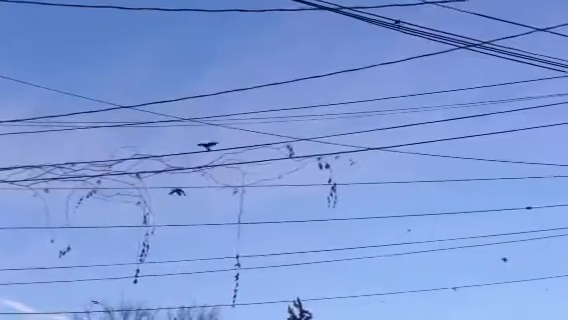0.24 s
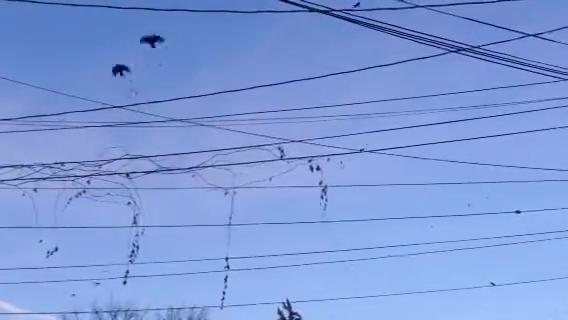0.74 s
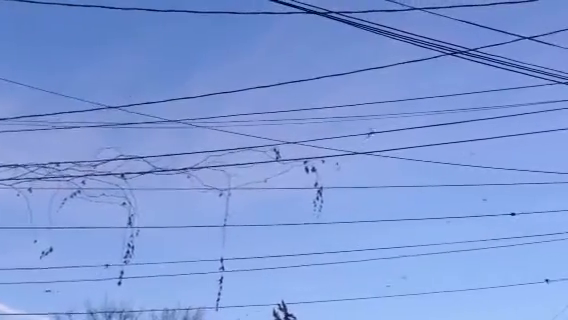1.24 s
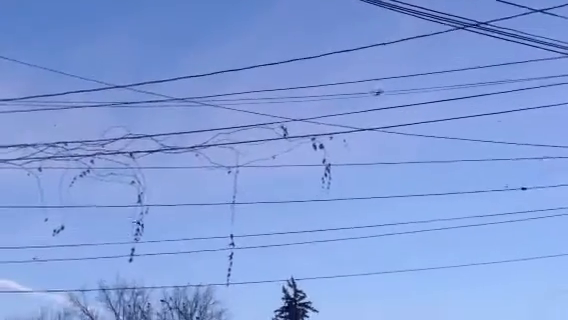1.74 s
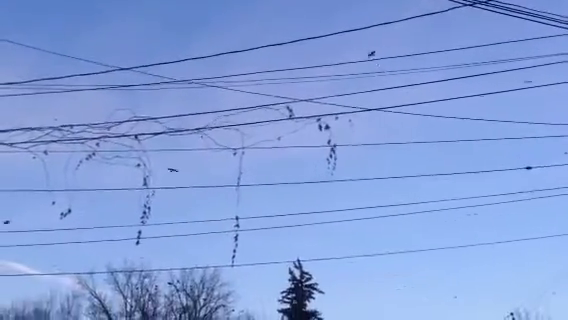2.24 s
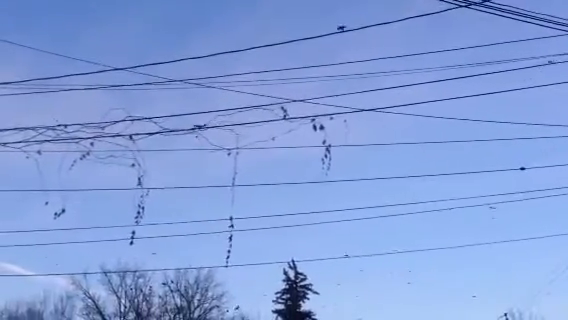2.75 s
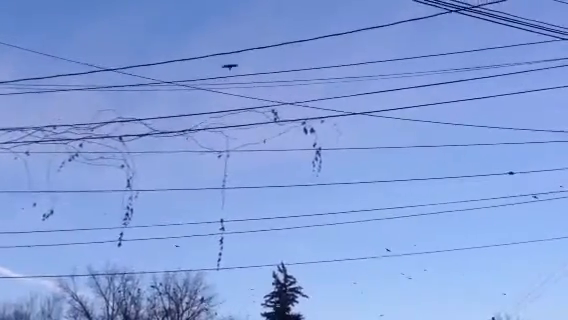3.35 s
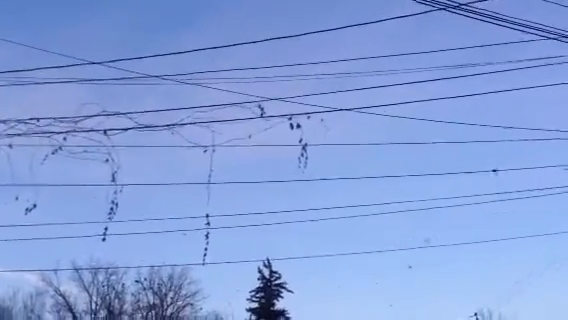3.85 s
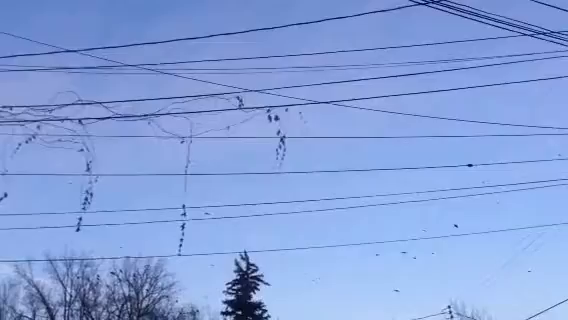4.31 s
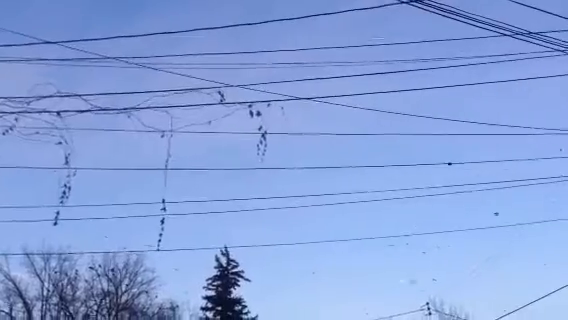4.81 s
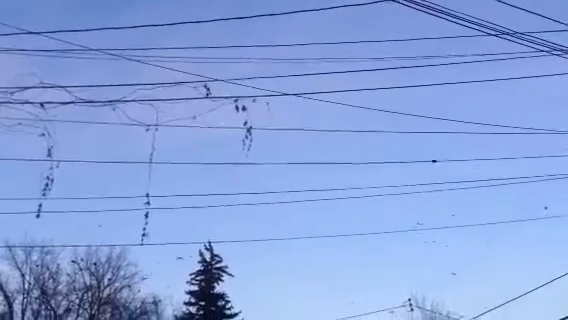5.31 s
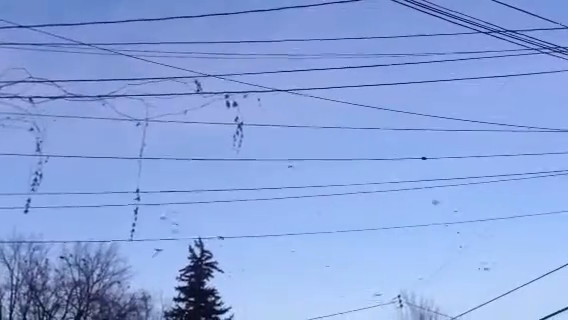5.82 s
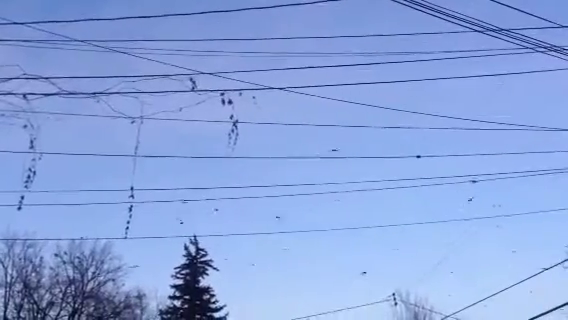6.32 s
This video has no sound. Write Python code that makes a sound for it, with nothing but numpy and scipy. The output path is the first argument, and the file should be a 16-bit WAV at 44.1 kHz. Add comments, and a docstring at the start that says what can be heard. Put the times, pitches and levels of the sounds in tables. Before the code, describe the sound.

A large flock of crows caws in a dense overlapping chorus outdoors, with nearer hoarse caws, a few clear yelps and one dry rattle.

```python
"""A winter street in a town, with a big flock of crows cawing over it. Nearer birds stand out with
arched, hoarse caws, one yelps on a high clear note and one gives a long dry rattle.
Each caw is a gliding stack of harmonics plus breath noise; each rattle knock is a short rising blip.
Many quieter caws blend into a far chorus, and houses and trees scatter all the calls.
Below them, filtered noise makes a low town rumble and microphone hiss, with a faint hum."""
import sys
import numpy as np
from scipy import signal
from scipy.fft import rfft, irfft, next_fast_len
from scipy.io import wavfile

SR = 44100
rng = np.random.default_rng(int(sys.argv[2]) if len(sys.argv) > 2 else 0)


def unload_wav(signal):
    """Save mono or channel-first audio to the path in sys.argv[1] as 16-bit WAV at rate SR, clipped to [-1, 1]."""
    wavfile.write(
        sys.argv[1],
        SR,
        np.round(np.clip(np.atleast_2d(signal).T, -1, 1) * 32767).astype(np.int16),
    )


N = 289737  # length of the scene in samples


def near_crows():
    """The birds that stand out of the chorus: hoarse caws, and the high, clear yelps of one bird."""
    # Nearer caws, levels before the final mix:
    # (start [s], length [s], top pitch [Hz], level [dB], treble setting [dB], roughness [0-1])
    caws = [ (-.06, 0.26, 595.4, -52.5, 3, 0.3), (0.113, .11, 648, -56, 3, .9),
            (0.477, 0.17, 698, -44.5, -2, 0.28), (0.53, .21, 593, -53.5, 9.5, 0.48),
            (0.875, .11, 776, -55, 2, 0.12), (1.015, 0.15, 690, -54.5, -9, 0.57),
            (1.481, 0.12, 596, -53.5, 1, 0.42), (1.581, .14, 671, -48.5, -2.5, 0.64),
            (2.062, 0.15, 700, -50.5, 0.5, 0.5), (2.158, 0.18, 609, -52, 0.5, 0.52),
            (2.579, 0.1, 665, -49, -2.5, 0.25), (2.67, 0.15, 705, -51.5, 2.5, 0.57),
            (2.747, .1, 720, -41, -8, 0.17), (2.81, 0.18, 690, -47.5, 0.5, 0.84),
            (3.126, 0.14, 727, -43.5, -8, 0.37), (3.287, .19, 690.4, -48, -4.5, 0.45),
            (3.199, .28, 647, -55, 6, 1), (3.439, 0.25, 665, -63, 15, 0.81),
            (3.826, .09, 714, -39.3, -10, 0.04), (3.948, .14, 731, -46, 1, 0.43),
            (4.06, .19, 639, -52, 7, .4), (4.237, 0.085, 718.4, -41, -6, .25),
            (4.328, 0.13, 680, -51, -1.5, 0.94), (4.548, .17, 700, -51, -1.5, 0.82),
            (4.92, 0.15, 754, -49, -6, 0.13), (5.658, 0.12, 766.4, -45, -1.5, 0.21),
            (5.829, .14, 650.5, -49, 5, 0.33), (6.02, .12, 785, -46.5, 4, 0.24),
            (6.214, .12, 689, -46.5, 3.5, 0.4), (6.307, 0.11, 667, -51.5, 3, .7),
            (6.475, .085, 765, -57, 10, 0)]
    # Yelps, levels before the final mix: (start [s], length [s], level [dB], treble setting [dB])
    yelps = [(1.123, 0.083, -52.5, -7), (1.364, 0.094, -56.5, -1), (1.614, 0.095, -57.5, -1),
             (1.848, .1, -58.5, 0), (6.333, .13, -50, 2)]
    yelp_hz, yelp_rough = 819, 0.032  # top pitch, and roughness from 0 to 1
    out = np.zeros(N)
    for start, length, top_hz, level_db, treble_db, rough in caws:
        call = near_caw(length, top_hz, treble_db, rough)
        add(out, start, undb(level_db) * call)
    for start, length, level_db, treble_db in yelps:
        call = near_caw(length, yelp_hz, treble_db, yelp_rough)
        add(out, start, undb(level_db) * call)
    return out


def near_caw(length, top_hz, treble_db, rough):
    """A caw by the shared rules: higher calls crest later, harsher ones gain edge and hiss."""
    usual_hz, usual_crest, crest_per_octave = 699, .36, 0.34  # crests are shares of the call's length
    crest = usual_crest + crest_per_octave * np.log2(top_hz / usual_hz)
    edge_db = -0.5 + 0.71 * treble_db  # near 3.4 kHz
    hiss_db = 0.35 + treble_db  # near 5.6 kHz
    return caw(length, top_hz, crest, .2, edge_db, hiss_db, rough)


def caw(length, top_hz, crest, fall, edge_db, hiss_db, rough, count=12, rise=.14, jitter=0.025,
        rasp_hz=75, breath=1.0, fray=0.24, flicker=0.36, yelp_db=9.5):
    """One caw: an arch of harmonics through the throat, shaken by a second, slow flutter of the syrinx."""
    # Filtering by the throat and open beak: (frequency [Hz], gain [dB])
    throat = [(500, -19.5), (730, -17), (950, -14), (1180, 1.5), (1430, 5), (1750, -3), (2050, -13.5),
              (2700, -24.5), (3500, -14.5), (4200, -21), (5700, -19.5), (7000, -32), (10000, -32),
              (14000, -40)]
    rasp_depth = .85
    dice = rng.standard_normal((3 + 2 * count, 512))
    t = np.arange(int(max(length, .03) * SR)) / SR
    u = t / t[-1]  # progress through the call, 0 to 1
    crest = np.clip(crest, .15, .85)
    rough = np.clip(rough, .01, 1)

    # The pitch climbs to the crest, then drops by the share "fall".
    climb = rise * np.clip(1 - u / crest, 0, 1) ** 2
    drop = fall * np.clip((u - crest) / (1 - crest), 0, 1) ** 1.6
    hz = top_hz * (1 - climb - drop)
    flutter_hz = rasp_hz * (1 + 0.351 * wander(t, 88.6, dice[0]))
    flutter = np.sin(2 * np.pi * np.cumsum(flutter_hz) / SR)
    shake = rough * jitter * (2 * wander(t, 596.1, dice[1]) + flutter)
    phase = 2 * np.pi * np.cumsum(hz * (1 + shake)) / SR

    opening = np.abs(np.sin(np.pi * u))  # the beak is widest in mid-call
    voice = 0
    for k in range(1, count + 1):
        # uneven beats of the membranes fray the high harmonics most
        slip = fray * k ** 1.326 * rough ** 0.32 * wander(t, 450, dice[1 + 2 * k])
        flickering = np.exp(flicker * wander(t, 69.3, dice[2 + 2 * k]))
        size = gain_at(k * hz, throat) * flickering * opening ** (0.0091 * k)
        voice = voice + size * np.sin(k * phase + slip)

    # Breath noise passes the same throat; the rasp shakes voice and breath together.
    air = np.resize(unit(colour(rng.standard_normal(2 ** 13), throat)), len(t))
    shaking = rasp_depth * flutter + 0.39 * wander(t, 108.0, dice[2])
    rasp = np.exp(np.sqrt(rough) * shaking / 2)
    voice = unit((unit(voice) + breath * rough * air) * rasp * opening ** 0.37)
    # calls that peak above 785 Hz are yelps, with a strong third harmonic
    yelp = yelp_db * np.clip((top_hz - 785) / 25, 0, 1)
    return colour(voice, [(1800, 0), (2350, yelp + edge_db / 3), (2800, yelp / 2 + edge_db - 4.0),
                          (3400, edge_db), (5600, hiss_db)])


def rattle(count=22, low_hz=1500, high_hz=2170, sweep_s=0.0079, width_s=0.0041, grit=0.71, echo_db=-6):
    """A crow's rattle: gritty knocks whose resonance flicks upward, blurred by branches around the bird."""
    # The run of knocks slows a little: each gap is longer than the last by slowing_s.
    start_s, gap_s, slowing_s = 3.4277, .04206, .000184
    # The run fades at both ends and its knocks are uneven; the level is before the final mix.
    level_db, fade_db, uneven_db = -43, 3.5, 1.1
    crest = 0.48  # share of the run at which it is loudest, apart from the unevenness
    out = np.zeros(N)
    t = np.arange(-SR // 50, SR // 50) / SR  # time around the middle of a knock
    since_start = t - t[0]
    hz = low_hz + (high_hz - low_hz) * (1 + np.tanh(2 * (t / sweep_s) + .5)) / 2
    for k, dice in enumerate(rng.standard_normal((count, 3, 128))):
        when = start_s + k * gap_s + k * (k - 1) / 2 * slowing_s
        fade = fade_db * (2 * (k / count - crest)) ** 2
        knock_db = level_db - fade + uneven_db * dice[2, 0]
        phase = 2 * np.pi * np.cumsum(hz) / SR + grit * wander(since_start, 697, dice[0])
        size = np.exp(-(t / width_s) ** 2 / 2 + 0.26 * wander(since_start, 522, dice[1]))
        add(out, when + t[0], undb(knock_db) * size * np.sin(phase))
    out = out + undb(echo_db) * scatter(out, t60=0.47, delay_s=0.0036)
    # the nearly closed beak passes one band
    return colour(out, [(900, -15), (1250, 0.5), (2250, -1.0), (2550, -15)])


def far_flock(count=130, bright_db=-4.0, spread_db=8, effort=0.97, gape_db=6):
    """Many birds, each with its own pitch and distance; air dulls them, excitement makes them harsher."""
    # Level before the final mix, which also sets the flock's excitement: (time [s], level [dB])
    flock_levels = [(0.0, -48.5), (0.27, -54.5), (0.51, -54), (0.66, -52.5), (1.06, -51), (1.22, -55.5),
                    (2.14, -53), (2.23, -51), (3.24, -49.5), (3.64, -49.5), (4.1, -47.5), (4.7, -52),
                    (5.07, -49.5), (5.53, -55.5), (6.2, -49.5), (6.57, -57)]
    out = np.zeros(N)
    times, levels = np.transpose(flock_levels)
    for i, (when, length, pitch, distance, rough) in enumerate(rng.random((count, 5))):
        start = (i + when) / count * (N / SR + .2) - .2  # one call at random in each equal slot
        excitement_db = np.interp(start, times, levels) - levels.mean()
        harsh_db = bright_db + effort * excitement_db
        call = caw(.11 + .13 * length, 600 + 180 * pitch, 0.401, .18, harsh_db, harsh_db,
                   0.16 + 0.67 * rough, count=8)
        add(out, start, undb(-spread_db * distance) * call)
    level_db = np.interp(np.arange(N) / SR, times, levels)
    # excited birds gape wider, which lifts the band around 2 kHz
    gape = np.clip((level_db - levels.min()) / np.ptp(levels), 0, 1)
    wide = colour(out, [(1400, 1.0), (1750, gape_db / 2), (2100, gape_db), (2600, -0.71), (3400, 1)])
    return unit(out + gape * (wide - out)) * undb(level_db)


def scatter(x, t60, delay_s=0.023, treble_db=-5):
    """Echoes from surfaces such as house fronts and trees: grainy, fading and duller than the call."""
    t = np.arange(SR) / SR
    grains = rng.standard_normal(SR) ** 3  # cubing makes a few echoes stand out
    fade = undb(-60 * t / t60)  # t60 is the time in seconds to fade by 60 dB
    build_up = 1 - np.exp(-(t / delay_s) ** 2)
    echoes = grains * fade * build_up
    tail = signal.fftconvolve(x, echoes / np.linalg.norm(echoes))[:N]
    return colour(tail, [(1500, 0.021), (6000, treble_db)])


def town(hum_hz=59, hum_db=-67):
    """Far traffic rumbles and swells under an even hiss, with a faint machine hum."""
    # Spectrum of town rumble and microphone hiss, before scaling: (frequency [Hz], level per Hz [dB])
    town_spectrum = [(20, -30), (40, -8.5), (60, -0.5), (80, -6), (125, -0.5), (165, -8.5), (300, -11.5),
                     (500, -18), (720, -16.5), (1100, -20.5), (2700, -29.5), (6000, -30.5), (10000, -35),
                     (15000, -35)]
    # Swell of the traffic, as gain changes:
    # (time [s], deep rumble below 60 Hz [dB], engine drone near 120 Hz [dB])
    traffic_swell = [(0, -1, 2), (.8, 0, 5.5), (1.4, -3, -2.5), (3.5, -7, -1), (4.3, -6.5, 1.5),
                     (6.57, 2, 0.5)]
    level_db = -56.5  # of rumble and hiss together, before the swell
    t = np.arange(N) / SR
    times, deep_db, drone_db = np.transpose(traffic_swell)
    air = unit(colour(rng.standard_normal(N), town_spectrum))
    low = colour(air, [(170, -3.5), (500, -33)])
    deep = colour(low, [(55, -1.5), (110, -41)])
    rumble = deep * undb(np.interp(t, times, deep_db))
    drone = (low - deep) * undb(np.interp(t, times, drone_db))
    hum_level_db = hum_db + 2.1 * wander(t, 3.5, rng.standard_normal(256))
    hum = undb(hum_level_db) * np.sin(2 * np.pi * hum_hz * t)
    return undb(level_db) * (air - low + rumble + drone) + hum


def undb(db):
    """Decibels to gain."""
    return 10 ** (np.asarray(db) / 20)


def unit(x):
    """Scale to an rms (average strength) of 1."""
    return x / np.sqrt(np.mean(x ** 2) + 1e-20)


def gain_at(hz, points):
    """Gain at the given frequencies, read from (frequency [Hz], level [dB]) points."""
    f, db = np.transpose(points)
    return undb(np.interp(np.log(hz + 1e-6), np.log(f), db))


def colour(x, points):
    """Filter a sound by (frequency [Hz], level [dB]) points."""
    size = next_fast_len(len(x))
    gain = gain_at(np.fft.rfftfreq(size, 1 / SR), points)
    return irfft(rfft(x, size) * gain, size)[:len(x)]


def wander(t, rate, dice):
    """Random values joined by lines, `rate` of them a second."""
    return np.interp(t * rate, np.arange(len(dice)), dice)


def add(out, start, x):
    """Mix a sound in at a given time in seconds, dropping what falls outside the scene."""
    i = int(start * SR)
    a, b = max(i, 0), min(i + len(x), len(out))
    if b > a:
        out[a:b] += x[a - i:b - i]


def scene():
    """Near birds are mostly direct; echoes take a larger share of the far flock."""
    near = near_crows() + rattle()
    far = far_flock()
    near_mix = undb(-1.5) * near + undb(-8.5) * scatter(near, t60=0.85)
    far_mix = undb(-3) * far + undb(-6.0) * scatter(far, t60=0.71)
    return (near_mix + far_mix + town())[None]


def record(dry):
    """The recorder cuts the top: a steep low-pass filter removes what lies above its limit."""
    top_hz = 15330
    return signal.sosfilt(signal.ellip(12, .2, 60, top_hz, fs=SR, output="sos"), dry)


dry = scene()
out = record(dry)
unload_wav(out)
```